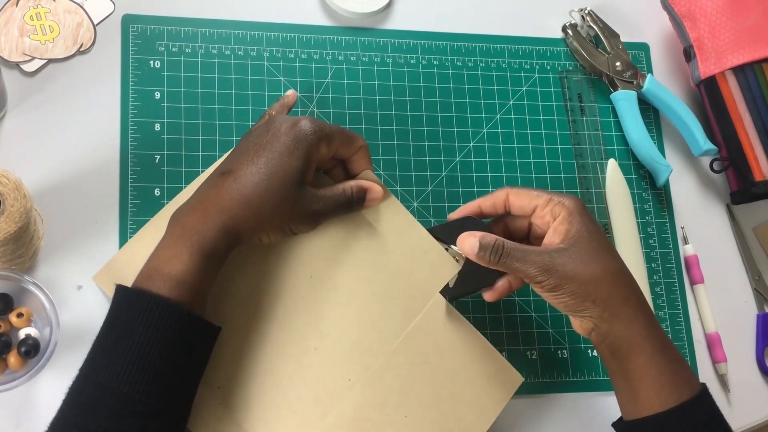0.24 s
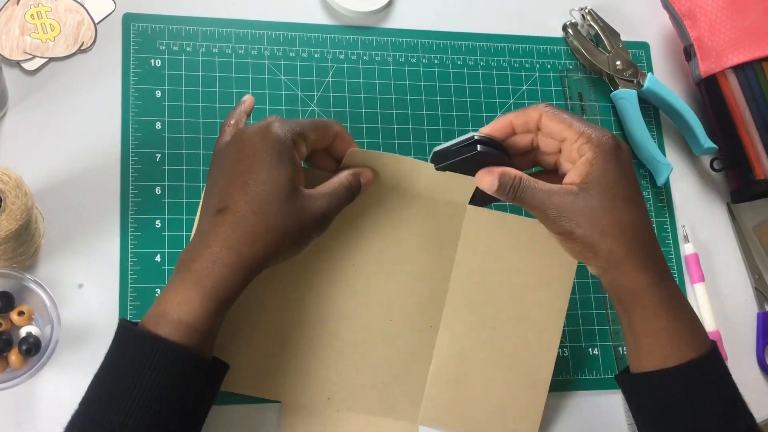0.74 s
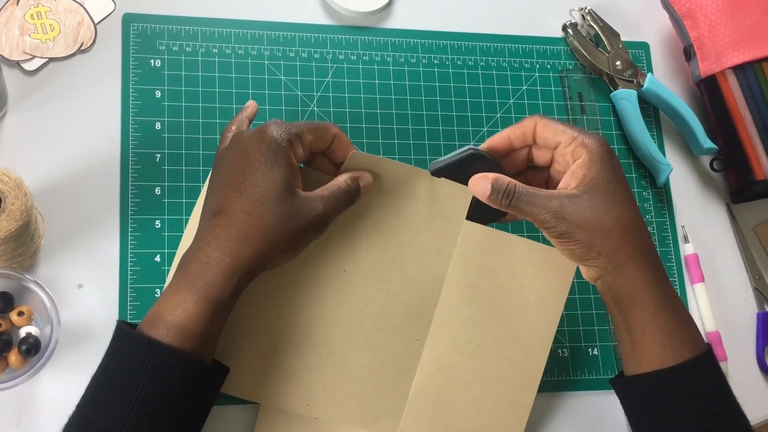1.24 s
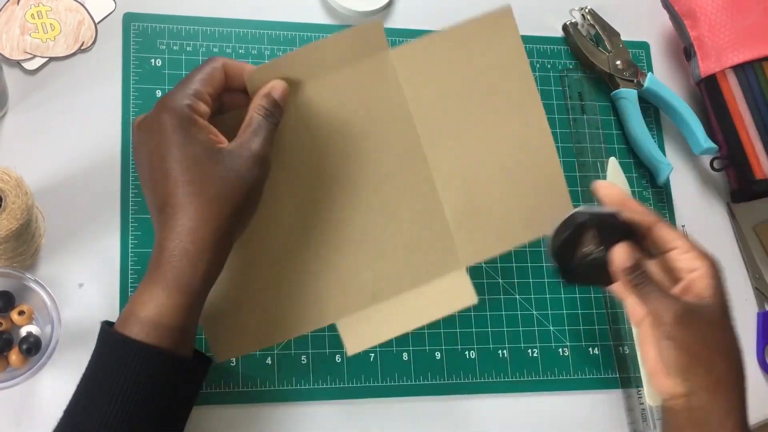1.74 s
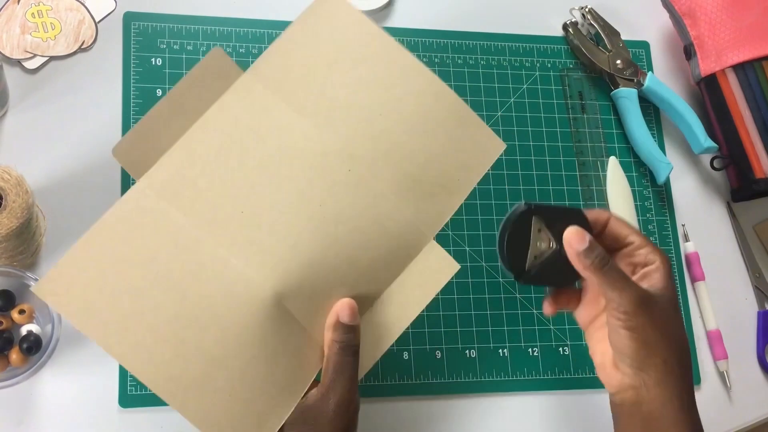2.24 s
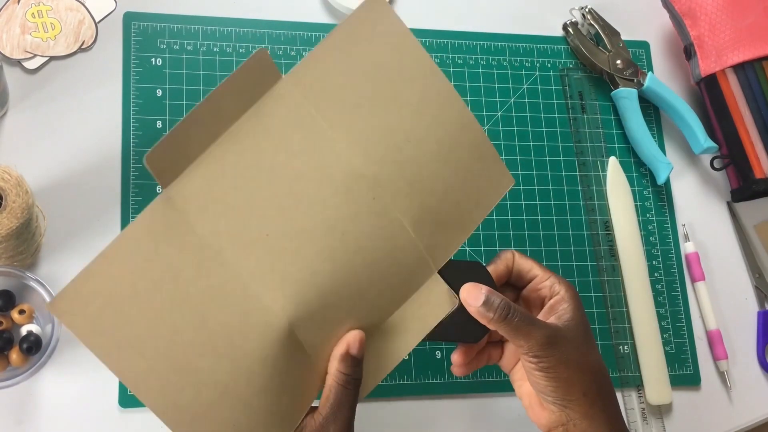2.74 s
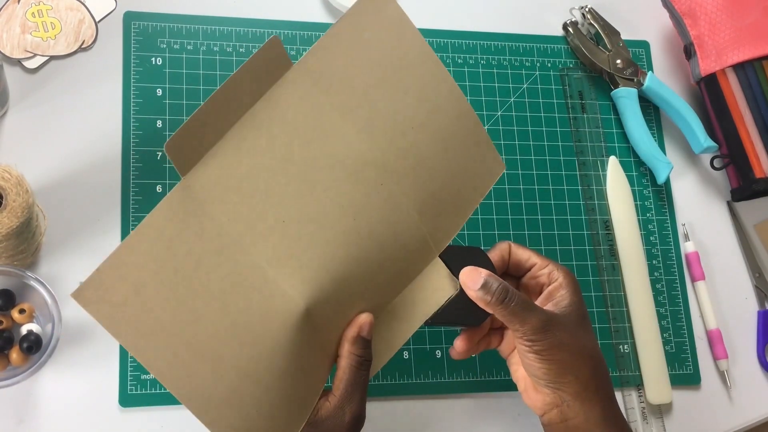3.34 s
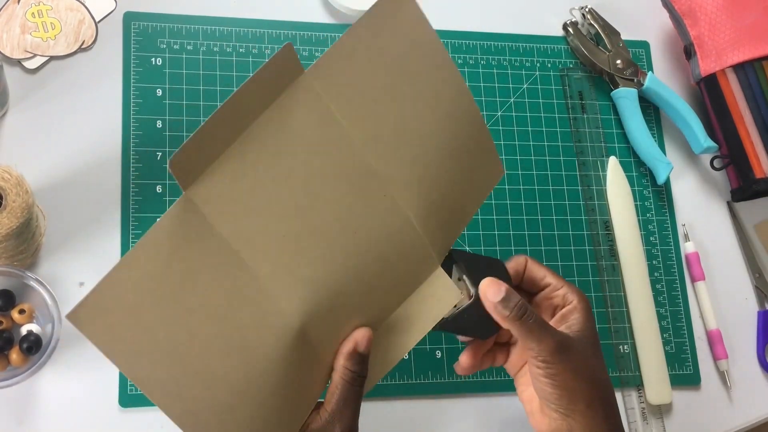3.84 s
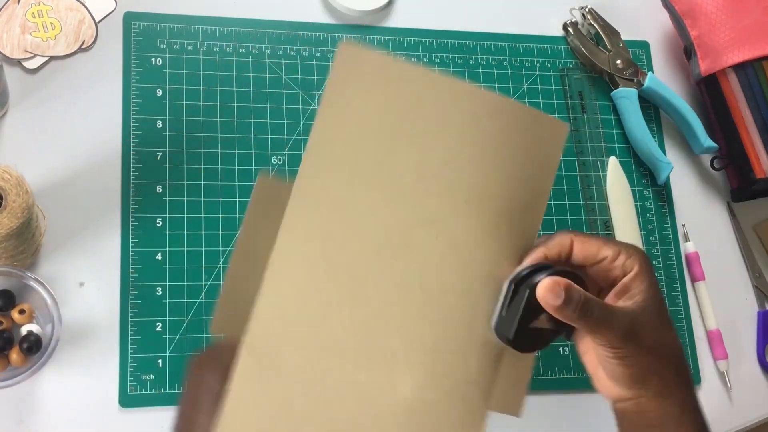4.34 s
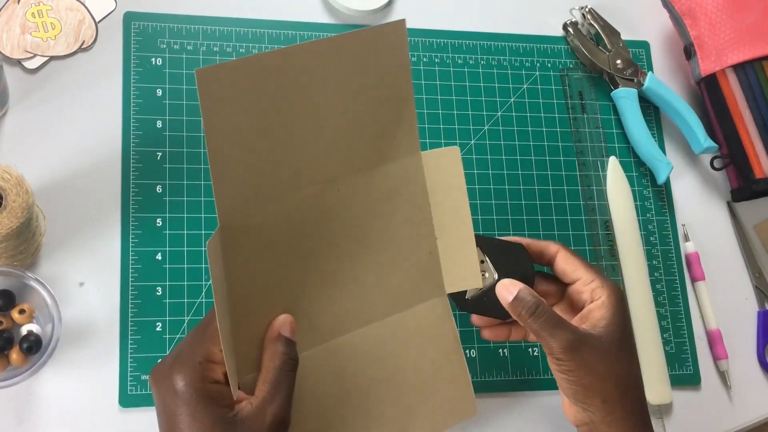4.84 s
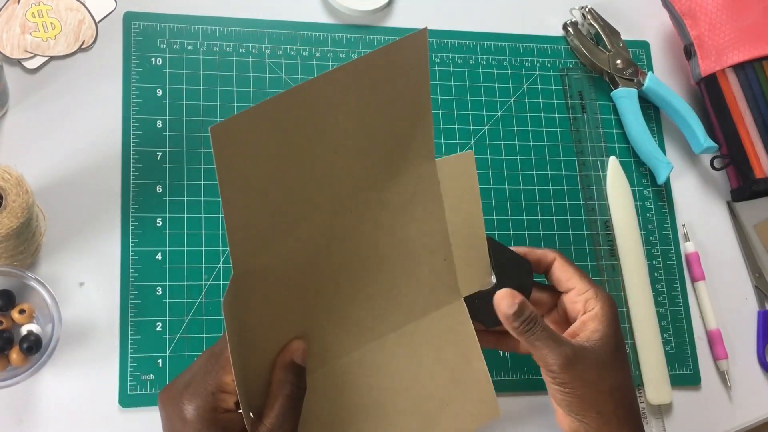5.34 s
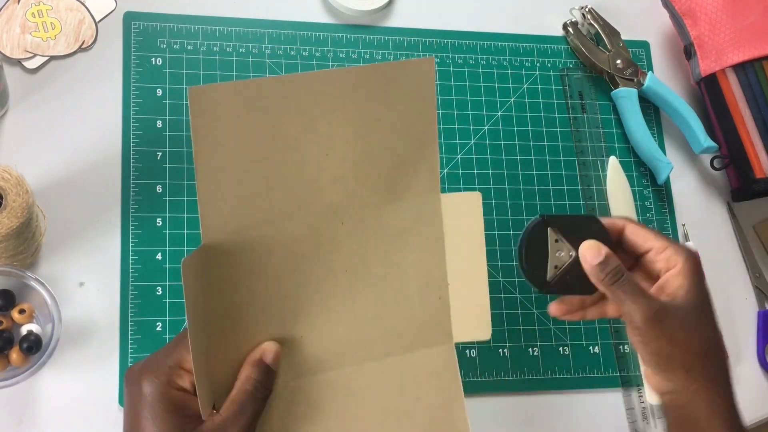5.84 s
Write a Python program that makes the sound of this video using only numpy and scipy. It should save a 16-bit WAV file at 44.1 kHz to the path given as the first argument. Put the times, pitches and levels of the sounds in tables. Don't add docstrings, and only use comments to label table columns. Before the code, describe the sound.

Three loud, crisp punch snaps on cardstock, spaced about two seconds apart, amid quick card scuffs, small ticks and faint low rumble.

```python
import sys
import numpy as np
from scipy import signal
from scipy.fft import rfft, irfft, next_fast_len
from scipy.io import wavfile
from scipy.ndimage import uniform_filter1d

SR = 44100
rng = np.random.default_rng(int(sys.argv[2]) if len(sys.argv) > 2 else 0)


def pcm_store(signal):
    levels = np.round(np.clip(np.atleast_2d(signal), -1, 1) * 32767)
    wavfile.write(sys.argv[1], SR, levels.astype(np.int16).T)


def gain_from_decibels(decibels):
    exponent = np.asarray(decibels, float) / 20
    return 10 ** exponent


N = 268108
SIZE, LEAD = 8192, 2048


def unit(x):
    return x / np.sqrt(np.mean(x ** 2))


def tone(points, size):
    hz, db = np.transpose(points)
    bins_hz = np.fft.rfftfreq(size, 1 / SR) + 1
    return gain_from_decibels(np.interp(np.log(bins_hz), np.log(hz), db))


def ring(modes, size):
    f = np.fft.rfftfreq(size, 1 / SR) + 1
    response = 0
    for k, (hz, width_hz, db) in enumerate(modes):
        response = response + (-1) ** k * gain_from_decibels(db) / (1 + 1j * (f - hz ** 2 / f) / max(width_hz, 10))
    return response


def causal(gain):
    cep = irfft(np.log(np.abs(gain) + 1e-9))
    cep[1:len(cep) // 2] *= 2
    cep[len(cep) // 2 + 1:] = 0
    return np.exp(rfft(cep))


def colour(x, response):
    return irfft(rfft(x) * response / np.sqrt(np.mean(np.abs(response) ** 2)), len(x))


def noise(points):
    size = next_fast_len(N)
    return colour(rng.standard_normal(size), tone(points, size))[:N]


def walk(rate, size):
    hold = max(int(1 / rate), 1)
    levels = np.repeat(rng.standard_normal(size // hold + 1), hold)
    return unit(uniform_filter1d(uniform_filter1d(levels, hold), hold)[:size])


def swell(rise_ms, fall_ms, drop_db):
    ms = (np.arange(SIZE) - LEAD) / SR * 1000
    rise = (-ms / max(rise_ms, .5)) ** 1.16
    fall = (ms / max(fall_ms, .5)) ** 1.06
    return gain_from_decibels(-drop_db * np.where(ms < 0, rise, fall))


def window(before_ms, after_ms):
    ms = (np.arange(SIZE) - LEAD) / SR * 1000
    return np.clip(1 - np.where(ms < 0, ms / before_ms, ms / after_ms) ** 2, 0, 1)


def add(out, s, sound):
    out[int(s * SR):int(s * SR) + SIZE] += sound


# frequency in Hz, level in dB per Hz.
AIR_TONE = [(12, -44), (20, -4), (60, -1), (134, -1.5), (200, -2), (515, -16.5), (1410, -24), (2840, -35.5),
            (4700, -38), (5890, -26), (7400, -29), (11800, -23.5), (15300, -29.5), (16000, -43)]
# frequency in Hz, width in Hz, level in dB.
RUMBLE_MODES = [(61.4, 30, -2), (142.7, 38, -4.5)]
# time in seconds, level in dB.
BUMPS = [(0.1, -44), (0.17, -46), (0.56, -45.5), (0.81, -49), (0.93, -51), (2.25, -46), (2.66, -42.5),
         (2.8, -50), (3.01, -45), (3.22, -47), (3.46, -49), (3.93, -45), (4.16, -39), (4.28, -41),
         (4.49, -46), (4.92, -52), (5.06, -40.5), (5.4, -46), (5.93, -53)]


def room():
    air_db, rumble_db, bump_ms = -54, -50, 28.5
    hush_s, hush_db = 5.83, -23.5
    size, t = next_fast_len(N), np.arange(N) / SR
    air = noise(AIR_TONE) * gain_from_decibels(air_db + 1.1 * walk(8 / SR, N))
    shake = gain_from_decibels(rumble_db + hush_db * np.clip((t - hush_s) / 0.027, 0, 1))
    for s, db in BUMPS:
        shake = shake + gain_from_decibels(db) * np.exp(-((t - s) * 1000 / bump_ms) ** 2)
    rumble = colour(rng.standard_normal(size), ring(RUMBLE_MODES, size) ** 2)[:N]
    return air + rumble * shake * gain_from_decibels(-4.5 + 2.2 * walk(14 / SR, N))


# time in seconds, level in dB.
SLIDE = [(0.0, -56.5), (0.29, -69.5), (0.44, -51), (0.53, -52), (0.62, -62), (0.9, -57.5), (1.3, -65),
         (1.74, -60.5), (2.1, -66.5), (2.4, -63), (3.3, -66), (3.73, -61), (3.9, -57), (4.2, -62),
         (4.5, -61.5), (5.2, -61), (5.7, -65.5), (6.08, -71)]
# frequency in Hz, level in dB per Hz.
FLEX_TONE = [(150, -21.5), (350, 0), (750, 6), (1100, 4), (1800, -3.5), (3000, -5.5), (6000, -10)]
# frequency in Hz, level in dB per Hz.
EDGE_TONE = [(700, -27.5), (1500, -4.5), (2600, 2), (3800, -1), (4900, -7), (5700, -3.5), (7000, -9),
             (9300, -4), (12800, -10.5), (16100, -16.5)]


def card_slide():
    hiss_rest_db, hiss_follows = -63.5, .45
    s, db = np.transpose(SLIDE)
    flex_db = np.interp(np.arange(N) / SR, s, db)
    hiss_db = hiss_rest_db + hiss_follows * (flex_db - np.mean(flex_db))
    shared_db = 1.8 * walk(45 / SR, N)
    flex = noise(FLEX_TONE) * gain_from_decibels(flex_db + shared_db + 3.7 * walk(120 / SR, N))
    return flex + noise(EDGE_TONE) * gain_from_decibels(hiss_db + shared_db)


def touch(rise_ms, fall_ms, knock_size, early_ms):
    crackle_per_s, crackle_size = 500, 3.4
    knock = np.clip(1.5 - (rise_ms + fall_ms) / 12, 0, 1)
    grit = gain_from_decibels(1.92 * walk(700 / SR, SIZE) + 1.15 * walk(4000 / SR, SIZE))
    crackle = rng.random(SIZE) < crackle_per_s / SR
    grit = grit * (1 + crackle_size * (1 - knock) * crackle)
    force = rng.standard_normal(SIZE) * grit * swell(rise_ms - 2.85 * knock, fall_ms, drop_db=8.5)
    force[LEAD] += knock_size * knock
    return np.roll(force, -int(early_ms * knock * SR / 1000))


def contacts(rows, sheet_ms, edge_ms, bright_db=0):
    sheet_lag_ms, bright_scatter_db, body_db = 1.4, 2.5, -8.5
    out = np.zeros(N + SIZE)
    for s, sheet_db, edge_db, hz, *own_bright_db in rows:
        modes = [(350, 250, body_db), (hz, .24 * hz, 0),
                 (1.666 * hz, 0.33 * hz, -7), (3.05 * hz, 1.1 * hz, body_db - 6.5)]
        sheet = colour(touch(*sheet_ms, knock_size=11.9, early_ms=2.6), ring(modes, SIZE))
        add(out, s + sheet_lag_ms / 1000, gain_from_decibels(sheet_db) * sheet)
        free = gain_from_decibels(2.5 * walk(1 / 40, SIZE // 2 + 1))
        tilt_db = own_bright_db[0] if own_bright_db else bright_db
        tilt_db = tilt_db + bright_scatter_db * rng.standard_normal()
        tint = tone(EDGE_TONE, SIZE) * tone([(4000, 0), (6000, tilt_db)], SIZE) * free
        edge = colour(touch(*edge_ms, knock_size=2.75, early_ms=1.0), causal(tint))
        add(out, s, gain_from_decibels(edge_db) * edge)
    return out[LEAD:LEAD + N]


# peak in seconds, sheet level in dB, edge level in dB, card pitch in Hz.
SCUFFS = [(0.006, -35.5, -47.5, 1100), (0.25, -42.5, -47.5, 915), (0.395, -43.5, -58, 925),
          (0.429, -54, -39.5, 1090), (0.552, -51.5, -44.5, 1050), (0.582, -45, -48, 990),
          (0.601, -70, -51.5, 900), (0.696, -62, -55.5, 900), (0.969, -53.5, -47.5, 900),
          (1.04, -48.5, -49.5, 1040), (1.425, -49.5, -54.5, 1030), (1.692, -55, -64, 900),
          (1.848, -41.5, -39.5, 1020), (1.925, -44.5, -65, 383), (2.212, -64, -43.5, 800),
          (2.488, -48, -50, 694), (2.598, -54, -49.5, 705), (3.063, -46.5, -53, 490),
          (3.741, -47, -55, 700), (3.891, -44.5, -63, 700), (3.922, -40.5, -49.5, 664),
          (4.076, -65, -50, 700), (4.116, -47, -43, 640), (4.282, -46.5, -41.5, 560),
          (4.463, -49, -42.5, 700), (4.998, -56, -52.5, 700), (5.187, -36, -46, 610),
          (5.231, -65, -44.5, 700), (5.31, -52, -51, 1040), (5.415, -49.5, -53, 896)]


def scuffs():
    return contacts(SCUFFS, sheet_ms=(5.5, 11), edge_ms=(5.2, 12), bright_db=0.31)


# peak in seconds, sheet level in dB, edge level in dB, card pitch in Hz.
TICKS = [(0.072, -63, -46.5, 900), (0.292, -41.5, -63, 1050), (0.488, -33.5, -40, 1030),
         (1.15, -34, -28.5, 870), (1.192, -37.5, -54, 800), (1.615, -65, -39, 900),
         (1.621, -63, -35.5, 900), (1.92, -47, -46, 900), (2.586, -42, -60, 654), (2.634, -47, -41.5, 694),
         (2.66, -33.5, -37, 565), (2.92, -51.5, -61, 377), (3.031, -32, -33.5, 640),
         (3.524, -46, -36.5, 1120), (3.529, -65, -40.5, 900), (3.643, -41, -28, 1230),
         (3.7255, -35, -55, 730), (3.752, -37.5, -39, 685), (4.087, -41.5, -35.5, 770),
         (4.321, -44, -37.5, 900), (4.495, -33.5, -33, 500), (4.545, -40, -65, 410),
         (4.564, -58, -42.5, 1500), (4.277, -41, -47, 554), (4.761, -55, -40, 800),
         (5.051, -62, -42.5, 700), (5.119, -41.5, -39, 623), (5.208, -58, -40, 700), (5.237, -39, -50, 690)]


def ticks():
    return contacts(TICKS, sheet_ms=(5, 4.4), edge_ms=(4, 2.5), bright_db=-3)


# peak in seconds, sheet level in dB, edge level in dB, card pitch in Hz.
DRAGS = [(0.202, -47.5, -62, 1050), (0.455, -66, -44, 900), (0.643, -65, -57, 910),
         (0.762, -42.5, -48.5, 920), (1.079, -64, -57.5, 900), (1.289, -68, -63, 905),
         (1.714, -53, -57, 905), (1.82, -53, -53, 895), (1.862, -60, -47, 1000), (1.888, -46.5, -43, 930),
         (2.135, -57, -52.5, 890), (2.173, -57, -46, 900), (2.275, -47, -41.5, 826), (2.362, -55, -52, 800),
         (2.553, -63, -61, 704), (2.818, -55.5, -54, 610), (2.922, -67, -59.5, 600),
         (3.021, -45, -50.5, 487), (3.871, -60, -56, 700), (3.955, -53, -47.5, 444),
         (4.13, -52, -45.5, 640), (4.3, -49.5, -50, 704), (4.516, -44.5, -42, 760),
         (4.575, -52, -49.5, 1490), (4.686, -81, -75, 900), (4.923, -48, -54, 1100),
         (5.044, -64, -55.5, 700), (5.259, -45, -47.5, 700), (5.553, -52, -64, 863),
         (5.806, -54, -45.5, 800)]


def drags():
    return contacts(DRAGS, sheet_ms=(15, 19.5), edge_ms=(19, 19), bright_db=1.5)


# peak in seconds, sheet level in dB, edge level in dB, card pitch in Hz.
SWEEPS = [(0.408, -60, -45, 900), (0.432, -44, -50, 1080), (0.812, -49.5, -43, 1050), (1.14, -52, -48, 890),
          (1.185, -59, -54.5, 800), (2.205, -49.5, -63, 1100), (2.236, -43, -35, 720),
          (2.691, -40, -40, 744), (3.019, -50, -46.5, 513), (3.877, -41.5, -56, 814),
          (3.986, -44.5, -46.5, 830), (4.305, -54, -42, 700), (4.322, -60, -45.5, 800),
          (4.641, -50.5, -46, 1640), (4.838, -56, -48, 800), (5.06, -43.5, -66, 700),
          (5.698, -51.5, -51.5, 680), (5.801, -33, -50, 856)]


def sweeps():
    return contacts(SWEEPS, sheet_ms=(18.5, 8), edge_ms=(13, 7.5), bright_db=1.5)


# peak in seconds, sheet level in dB, edge level in dB, card pitch in Hz,
# brightness in dB above 5 kHz.
KNOCKS = [
    (0.7733, -23, -33, 830, 14),
    (3.647, -30.5, -34.5, 623, -4),
    (4.15, -26.5, -26, 736, -1),
    (4.1584, -27.5, -28.5, 714, 14),
    (4.167, -28.5, -34.5, 747, 11),
]


def knocks():
    return contacts(KNOCKS, sheet_ms=(7.5, 6.5), edge_ms=(5.2, 5))


# time in seconds, level in dB, rise in ms, fall in ms, list of ringing in Hz.
SQUEAKS = [
    (0.776, -31, 5, 6, [1480]),
    (1.143, -39, 8, 7, [3200, 4400, 9100, 6200]),
    (4.463, -45, 5, 12, [2100, 3900, 6800]),
    (4.563, -43, 2, 2, [3300]),
]


def squeaks():
    out = np.zeros(N + SIZE)
    for s, db, rise_ms, fall_ms, rings_hz in SQUEAKS:
        die = ring([(hz, 150, -3.5 * k) for k, hz in enumerate(rings_hz)], SIZE)
        add(out, s, gain_from_decibels(db) * colour(touch(rise_ms, fall_ms, knock_size=21, early_ms=0.6), die))
    return out[LEAD:LEAD + N]


# peak in seconds, bass in dB, rise in ms, fall in ms, room tail in dB.
BITES = [
    (1.545, 3, 9.9, 5.4, -34),
    (3.4566, -11.5, 3.4, 11.2, -35.5),
    (5.740, 1.5, 6, 8.4, -31.5),
]
# time in seconds, level in dB.
CRACKS = [
    (1.5431, -11),
    (1.5446, -5),
    (3.4574, -3),
    (5.7379, -6),
    (5.7388, -6),
    (5.7404, -4),
]
# frequency in Hz, width in Hz, level in dB.
SHELL = [
    [(387, 120, -8.5), (1100, 50, -1), (2940, 690, -7.5), (4450, 130, 2), (6010, 180, 2.5),
     (7900, 540, -0.5), (10250, 700, 2), (12100, 400, -1)],
    [(330, 150, 4.5), (1050, 88, 1), (1890, 270, -4.5), (2720, 320, -6.5), (3970, 280, 2.5),
     (5920, 400, -2.5), (8900, 660, -2), (12400, 750, 0)],
    [(407, 86, -1.5), (800, 340, -9), (2380, 320, -3.5), (4540, 460, -1), (5990, 200, -1), (7270, 200, 5),
     (9250, 430, 1), (13160, 1400, -5.5)],
]
# frequency in Hz, level in dB per Hz.
BITE_TONE = [(88, -34), (150, -22), (1040, -4), (1670, -5), (2420, -2.5), (3240, -5.5), (4430, -7),
             (6560, -11.5), (8970, -9.5), (13300, -12.5), (16100, -22.5)]


def punch():
    tear_db, shell_fill = -12.5, 0.23
    opening_ms = 11.8
    out = np.zeros(N + SIZE)
    bite_tone = tone(BITE_TONE, SIZE)
    thin = tone([(500, -10.5), (2500, -5.5)], SIZE)
    dull = bite_tone * tone([(1000, -6.5), (14000, -12.5)], SIZE)
    for (s, bass_db, rise_ms, fall_ms, room_db), modes in zip(BITES, SHELL):
        shell = shell_fill + np.abs(ring(modes, SIZE))
        tint = bite_tone * tone([(700, bass_db), (1000, 0.0086)], SIZE) * shell
        before_ms = opening_ms + rise_ms
        shoulder = np.sqrt(swell(rise_ms, fall_ms, drop_db=11.5)) * window(before_ms, 46)
        force = 0.39 * swell(4.4, 3.9, drop_db=5) + 0.82 * shoulder
        grain = gain_from_decibels(1.8 * walk(1500 / SR, SIZE))
        tear = gain_from_decibels(tear_db) * force * grain * rng.standard_normal(SIZE)
        cracks = np.zeros(SIZE)
        for crack_s, db in CRACKS:
            if abs(crack_s - s) < .02:
                cracks[LEAD + int((crack_s - s) * SR)] = -3.8 * gain_from_decibels(db)
        tail = gain_from_decibels(room_db) * swell(9.4, 28.6, drop_db=5.5) * window(before_ms, 100)
        tail = tail * gain_from_decibels(2.2 * walk(250 / SR, SIZE)) * rng.standard_normal(SIZE)
        add(out, s, colour(tear, causal(tint)))
        add(out, s, colour(cracks, causal(np.sqrt(tint) * thin)))
        add(out, s, colour(tail, dull))
    return out[LEAD:LEAD + N]


def scene():
    card = card_slide() + scuffs() + ticks() + drags() + sweeps() + knocks() + squeaks()
    return (room() + card + punch())[None]


def roll_off(x):
    return signal.sosfilt(signal.butter(12, 16290, fs=SR, output="sos"), x)


def record(dry):
    top = signal.ellip(8, .2, 70, 15800, fs=SR, output="sos")
    mix = np.clip(signal.sosfilt(top, dry), -.95, .95)
    return roll_off(mix)


dry = scene()
out = record(dry)
pcm_store(out)
```